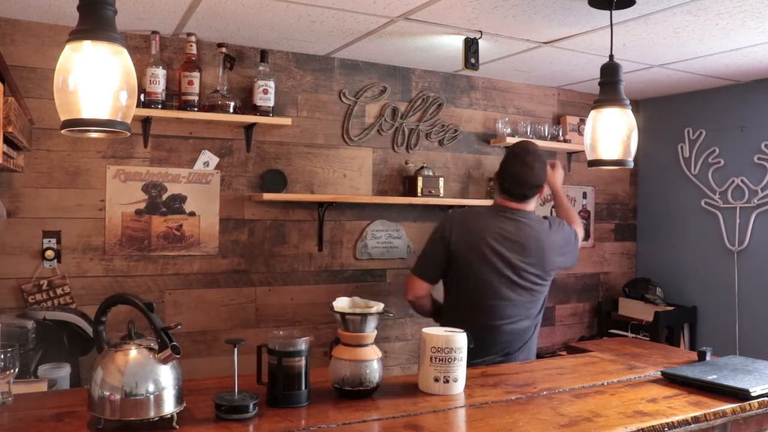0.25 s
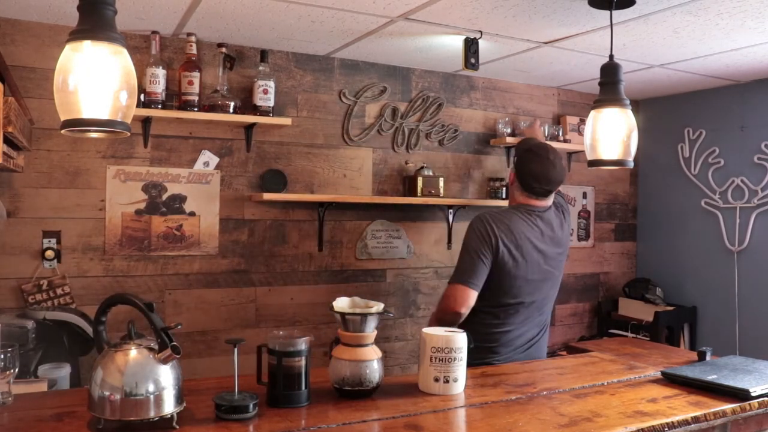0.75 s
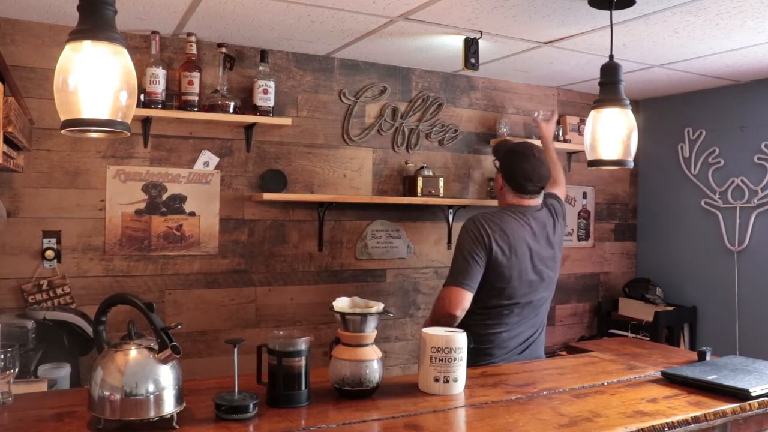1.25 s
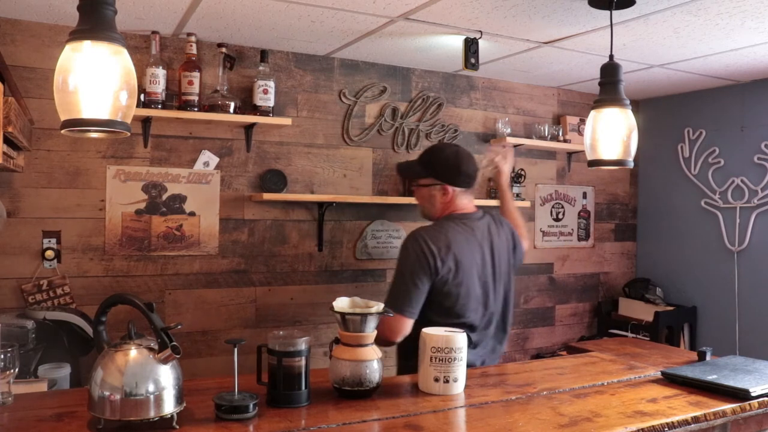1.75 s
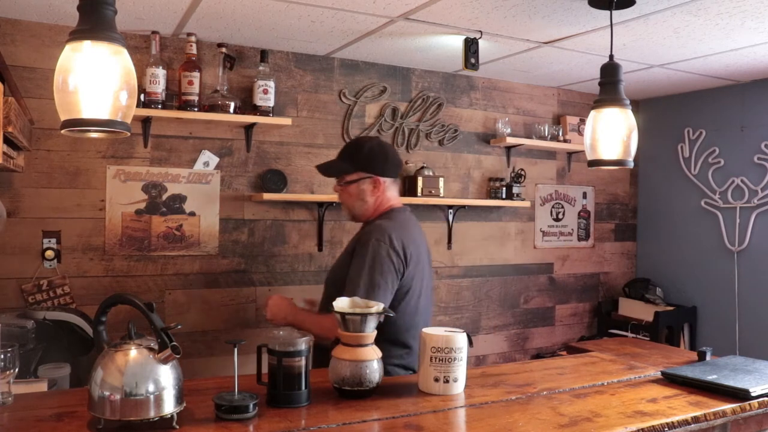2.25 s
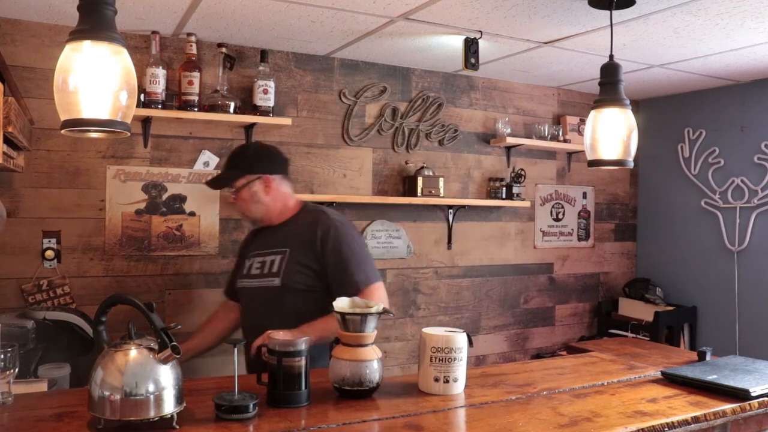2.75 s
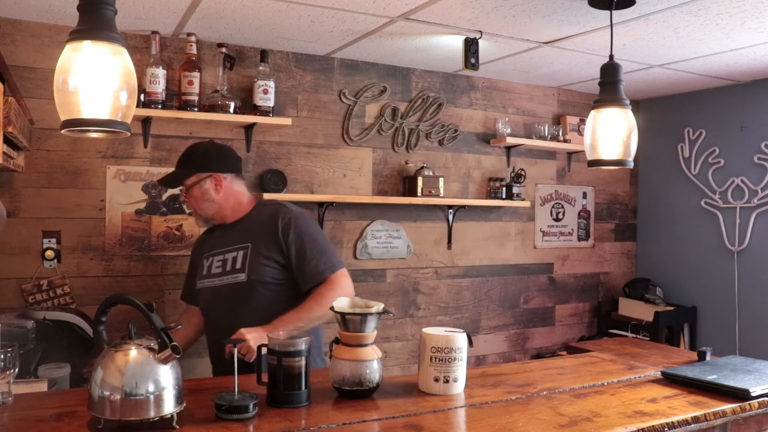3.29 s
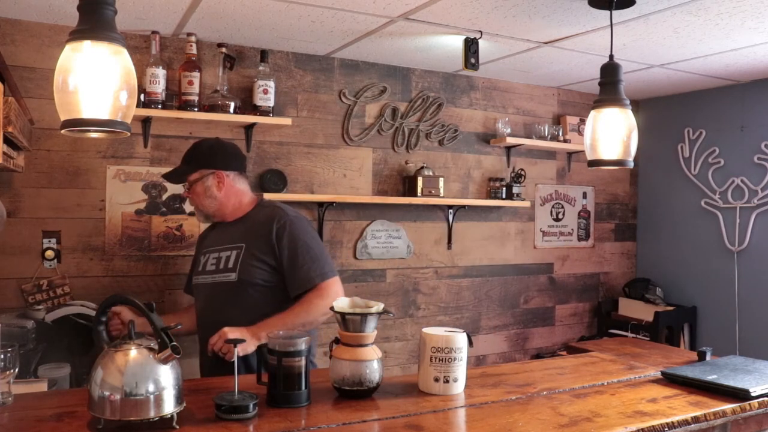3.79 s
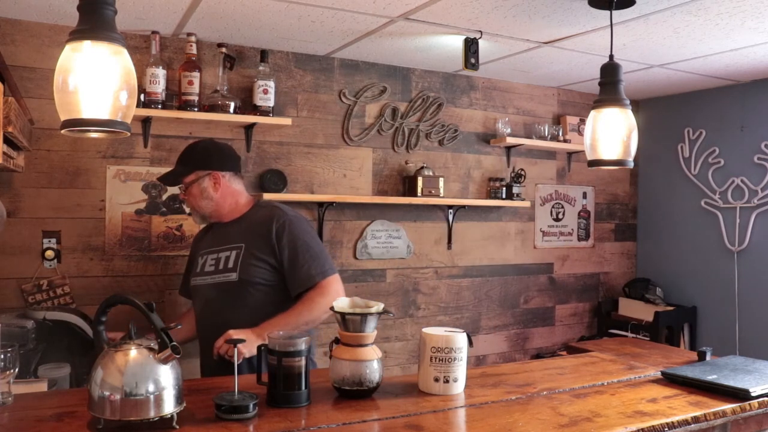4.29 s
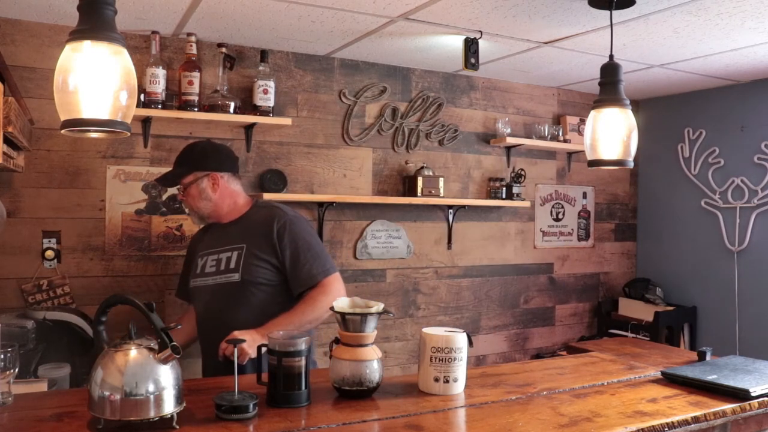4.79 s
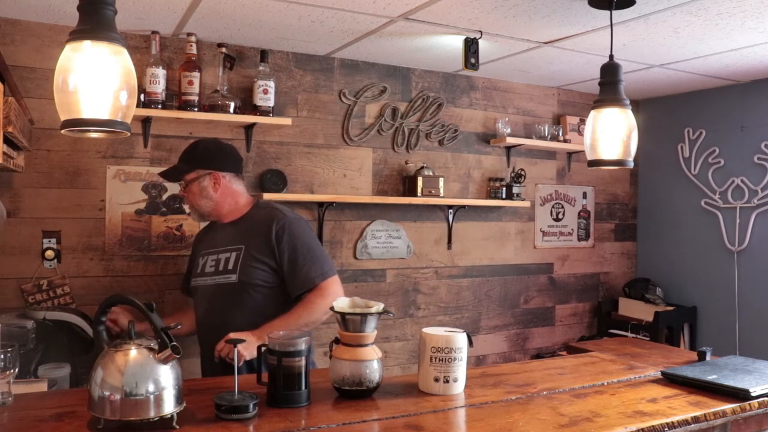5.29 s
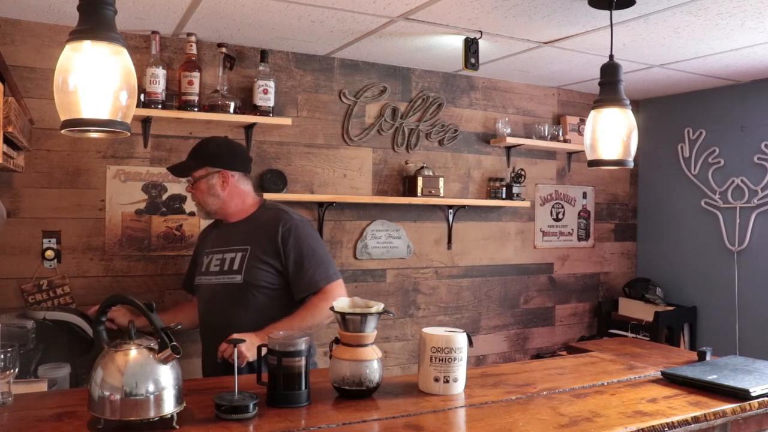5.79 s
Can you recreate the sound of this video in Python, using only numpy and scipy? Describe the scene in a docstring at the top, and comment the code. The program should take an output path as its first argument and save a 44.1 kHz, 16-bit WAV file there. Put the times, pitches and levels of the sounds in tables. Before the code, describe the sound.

A mug knocks onto a drip tray, then a pod brewer's lid snaps open and closes with a thump in a quiet room.

```python
"""A faint hiss fills a small wood-panelled room. A few metres away a man's clothes rustle by friction
as he takes a mug from a shelf with light clicks and clinks. At 3.2 s he stands it on the drip tray of
a pod coffee brewer, and the impact excites damped resonances. From 3.6 s the plastic lid rubs and
snaps open and a pod drops in. At 4.8 s he presses the lid shut with a thump; a few soft bumps and
clinks follow."""
import sys
import numpy as np
from scipy import signal
from scipy.fft import rfft, irfft
from scipy.io import wavfile
from scipy.ndimage import uniform_filter1d

SR = 44100
rng = np.random.default_rng(int(sys.argv[2]) if len(sys.argv) > 2 else 0)


def master_out(mix):
    """Clip the mix to full scale and print it as 16-bit PCM to the path in sys.argv[1]."""
    frames = np.transpose(np.atleast_2d(mix))
    ceiling = np.clip(frames, -1, 1)
    pcm = np.round(ceiling * 32767).astype(np.int16)
    wavfile.write(sys.argv[1], SR, pcm)


N = 266496
TIME = np.arange(N) / SR
AGE = TIME[:SR // 2]  # time since an impact [s]


def undb(db):
    """Decibels to amplitude ratio."""
    return 10 ** (np.asarray(db) / 20)


def along(points, hz):
    """Interpolate (frequency, value) points on a log-frequency axis."""
    f, value = np.transpose(points)
    return np.interp(np.log(hz + 1e-3), np.log(f), value)


def noise(spectrum):
    """Random-phase noise of rms 1 with the given spectral shape."""
    hz = np.fft.rfftfreq(N, 1 / SR)
    phases = np.exp(2j * np.pi * rng.random(len(hz)))
    x = irfft(undb(along(spectrum, hz)) * phases, N)
    return x / x.std()


def wander(rate):
    """Random modulation: ramps between about `rate` Gaussian values a second."""
    knots = np.linspace(0, TIME[-1], int(rate * TIME[-1]))
    return np.interp(TIME, knots, rng.standard_normal(len(knots)))


def band(x, hz, kind):
    """Butterworth filter."""
    return signal.sosfilt(signal.butter(3, hz, kind, fs=SR, output="sos"), x)


def unit(x):
    """Normalise to energy 1."""
    return x / np.sqrt(np.sum(x ** 2) + 1e-18)


def burst(x, db):
    """Give a transient the energy of 10 ms at this level."""
    return unit(x) * undb(db) * np.sqrt(SR / 100)


def add(out, start, x):
    """Superpose x on out from `start` seconds on."""
    i = max(int(start * SR), 0)
    out[i:i + len(x)] += x[:max(N - i, 0)]


def fade(t60):
    """Exponential decay by 60 dB in t60 seconds."""
    return np.exp(-np.log(1000) * AGE / max(t60, 1e-4))


def whiten(x):
    """Spectral whitening: level a random response so that it adds no note of its own."""
    spectrum = rfft(x, 2 * len(x))
    power = uniform_filter1d(uniform_filter1d(np.abs(spectrum) ** 2, size=45), size=45)
    flat = spectrum / np.sqrt(power + .1 * power.mean())
    return unit(irfft(flat)[:len(x)])


# noise floor spectrum (frequency [Hz], relative level [dB])
HISS_SPECTRUM = [(12, -28), (20, -4), (68, -1), (298, -8), (333, -10), (452, -10.5), (631, -11),
                 (1200, -14), (1300, -15.5), (1500, -15.5), (1980, -17.5), (2270, -17), (3540, -19.5),
                 (15500, -23)]
# spectral weighting of the left-right difference (frequency [Hz], gain [dB])
SIDE_WEIGHTING = [(60, -13.5), (110, -14), (200, -17), (380, -15), (700, -16.5), (1290, -19.5), (2380, -18),
                  (4400, -13), (8120, -10), (15000, -8)]
def hiss(level_db=-64, waver_db=0.57, side_db=-1.5):
    """Partial coherence: room air and microphone noise are nearly alike left and right."""
    mid = noise(HISS_SPECTRUM)
    weighting = undb(side_db + along(SIDE_WEIGHTING, np.fft.rfftfreq(N, 1 / SR)))
    side = irfft(rfft(noise(HISS_SPECTRUM)) * weighting, N)
    mid *= undb(waver_db * wander(6))
    return undb(level_db) * np.array([mid + side, mid - side])


def friction(strokes, spectrum, attack_s, release_s, grain_db):
    """Stick-slip friction: hundreds of uneven slips a second modulate the noise of each stroke."""
    envelope = np.zeros(N)
    for start, length, db in strokes:
        swell = np.clip((TIME - start) / attack_s, 0, 1)
        release = np.exp(-np.maximum(TIME - start - length, 0) / release_s)
        envelope += undb(db) * swell * release
    slips = undb(grain_db * wander(400))
    sliding = noise(spectrum) * slips
    return sliding / sliding.std() * envelope


# he steps up, stretches and turns (time [s], duration [s], level [dB])
BODY_MOVES = [(0, 0.062, -65), (.48, 1.71, -71.5), (2.52, 0.81, -72.5)]
# spectrum of his clothes (frequency [Hz], relative level [dB])
CLOTHES_SPECTRUM = [(60, -25), (250, 3.5), (800, 1.5), (1300, -2.5), (2200, -12), (8000, -31)]
def clothes_rustle():
    """Friction of cloth in slips of nearly equal size gives a smooth, dull rustle."""
    return friction(BODY_MOVES, CLOTHES_SPECTRUM, attack_s=0.013, release_s=0.063, grain_db=1)


# moves of the arm (time [s], duration [s], level [dB])
ARM_MOVES = [(0.02, 0.055, -62.5), (.24, 0.036, -67.5), (1.49, 0.043, -65.5), (1.82, 0.16, -66.5),
             (2.56, 0.044, -60), (2.79, 0.12, -66)]
# spectrum of the sleeve (frequency [Hz], relative level [dB])
SLEEVE_SPECTRUM = [(100, 3), (600, 2), (2800, 0), (6000, -8), (9000, -11.5), (16000, -41)]
def sleeve_rustle():
    """Friction of cloth in short, uneven strokes gives a brighter, grainy rustle."""
    return friction(ARM_MOVES, SLEEVE_SPECTRUM, attack_s=0.011, release_s=0.063, grain_db=5)


LOWEST_HZ = 131  # a small body radiates little below this
BASS_HZ, TREBLE_HZ = 400, 3500
def impacts(blows, modes, shell, shell_db, bass_gain_db, gain_db):
    """Modal superposition: each blow rings damped modes and a dense, brief rattle of the shell."""
    out = np.zeros(N)
    ringing = np.zeros(len(AGE))
    for hz, bandwidth, db in modes:
        decay = np.exp(-np.pi * bandwidth * AGE)
        ringing += undb(db) * 2 * np.pi * bandwidth / SR * decay * np.sin(2 * np.pi * hz * AGE)
    size = 2 * len(AGE)
    colour = undb(shell_db + along(shell, np.fft.rfftfreq(size, 1 / SR)))
    for start, db, bass_db, treble_db, rattle_t60 in blows:
        rattle = whiten(rng.standard_normal(len(AGE)) * fade(rattle_t60))
        vibration = ringing + irfft(rfft(rattle, size) * colour)[:len(AGE)]
        # the blow's weight sets the bass, its hardness the treble
        bass = burst(band(vibration, [LOWEST_HZ, BASS_HZ], "band"), db + bass_db + bass_gain_db)
        middle = burst(band(vibration, [BASS_HZ, TREBLE_HZ], "band"), db)
        treble = burst(band(vibration, TREBLE_HZ, "high"), db + treble_db)
        add(out, start, bass + middle + treble)
    return out * undb(gain_db)


# things handled at the shelf (time [s], relative level [dB], treble offset [dB])
SHELF_CONTACTS = [(0.025, -50.5, -7), (1.681, -42.5, -10), (1.757, -40.5, -8.5), (1.874, -52, -4),
                  (1.925, -53, -4), (1.987, -51, 3.5), (2.037, -45.5, -4.5)]
# their modes (frequency [Hz], bandwidth [Hz], gain [dB])
SHELF_RESONANCES = [(2740, 350, 1), (3220, 820, -13), (5170, 390, -30)]
# their rattle spectrum (frequency [Hz], gain [dB])
SHELF_RATTLE = [(120, -35), (300, -21), (700, -1), (1700, -4), (2700, -3), (5000, 5.5), (8700, 7),
                (11000, 0), (16000, -26)]
def shelf_clicks(bass_db=-14, rattle_t60=0.057):
    """Light, hard impacts excite heavily damped high modes, heard as clicks."""
    blows = [(start, db, bass_db, treble_db, rattle_t60) for start, db, treble_db in SHELF_CONTACTS]
    return impacts(blows, SHELF_RESONANCES, SHELF_RATTLE, shell_db=2, bass_gain_db=-2, gain_db=-9)


# small taps that ring with one note (time [s], level [dB], frequency [Hz])
RINGING_TAPS = [(0.448, -66, 4270), (0.582, -65, 7070), (0.684, -54, 2280), (0.715, -65, 2310),
                (1.243, -65, 2370), (1.45, -66.5, 2310), (1.522, -62, 1276), (1.562, -64.5, 1320),
                (1.664, -64, 2170), (2.299, -66, 2450), (2.433, -53, 770), (3.121, -62, 2260),
                (3.742, -51, 8000), (3.778, -41, 1580), (3.865, -57, 4170), (4.298, -39.5, 1620),
                (4.701, -51.5, 1710), (5.696, -52.5, 746), (5.822, -62.5, 1580), (6.027, -58.5, 866)]
def clinks(tick_db=-6, tick_t60=0.031, note_db=-1, t60_cycles=51):
    """Constant-Q decay: after a tick each note rings a set number of cycles, so high ones die sooner."""
    out = np.zeros(N)
    for start, db, hz in RINGING_TAPS:
        note = unit(np.sin(2 * np.pi * hz * AGE) * fade(t60_cycles / hz))
        contact = whiten(rng.standard_normal(len(AGE)) * fade(tick_t60))
        tick = unit(signal.lfilter(*signal.iirpeak(hz, Q=3.5, fs=SR), contact))
        add(out, start, burst(undb(note_db) * note + undb(tick_db) * tick, db))
    return out


# the mug lands (time [s], relative level [dB], bass offset [dB], treble offset [dB], rattle T60 [s])
MUG_CONTACTS = [(3.1545, -25.5, -21.5, -16.5, 0.026), (3.157, -15.5, -22.5, -23.5, 0.017),
                (3.1665, -32.5, -3, -30, 0.22)]
# modes of mug and tray (frequency [Hz], bandwidth [Hz], gain [dB])
MUG_RESONANCES = [(172, 46, -13), (420, 91, -17), (780, 37, -17), (906, 31, 3), (948, 61, 2.5),
                  (1194, 43, -2.5), (1640, 143, 1.5), (1730, 36, -17), (1900, 50, -28)]
# their rattle spectrum (frequency [Hz], gain [dB])
MUG_RATTLE = [(40, -37), (130, -10.5), (400, -18), (900, -13), (1800, -10.5), (2300, -25), (3600, -17.5),
              (4400, -24.5), (5600, -16), (7500, -21), (10000, -31.5), (16000, -54.5)]
def mug_on_tray():
    """Impulse excitation: the mug meets the drip tray edge first, in three quick contacts."""
    return impacts(MUG_CONTACTS, MUG_RESONANCES, MUG_RATTLE, shell_db=1.5, bass_gain_db=4.5, gain_db=-8)


# the lid unlatches, grinds up and snaps open; the pod drops in
# (time [s], relative level [dB], treble offset [dB], rattle T60 [s], rebound offset [dB])
SNAPS = [(3.645, -39.5, -4, 0.044, -10), (3.743, -33.5, 4, 0.052, -2), (3.776, -29, -5, 0.032, -0.5),
         (3.816, -29.5, -9.5, 0.032, -7), (4.073, -39, -11, .035, -6), (4.111, -19, -5.5, 0.032, 0.5),
         (4.227, -38.5, -1, .05, -14), (4.254, -42, 6.5, .055, -11), (4.297, -37.5, 2.5, 0.02, -13)]
# loose parts knock back, each time weaker and heavier (delay [s], level offset [dB], bass offset [dB])
SNAP_REBOUNDS = [(0.01, -0.5, -21), (0.029, -12.5, 0), (0.052, -19.5, 5.5)]
# hand and lid bump the brewer's body (time [s], relative level [dB])
SOFT_BUMPS = [(3.686, -40.5), (3.751, -35), (4.302, -43), (4.44, -56), (4.47, -56.5), (5.696, -47),
              (5.764, -54.5), (5.879, -49), (5.992, -52)]
# modes of the lid (frequency [Hz], bandwidth [Hz], gain [dB])
LID_RESONANCES = [(202, 90, -1.5), (350, 60, 0), (610.4, 14, 4), (870, 55, -3), (882, 145, -4),
                  (1460, 30, 6), (1620, 42, 1.5), (1720, 30, -22), (1980, 13, 1), (3130, 56, -6)]
# its rattle spectrum (frequency [Hz], gain [dB])
LID_RATTLE = [(40, -26), (90, -18), (200, -8), (700, -4), (1150, -7), (1700, -5), (2500, -10.5),
              (3800, -16.5), (5300, -12.5), (7000, -22.5), (8600, -19), (11000, -30), (16000, -40)]
def lid_knocks():
    """Contact hardness sets timbre: thin snaps, dull rebounds and soft bumps ring the same modes."""
    snap_bass_db = -20
    rebound_treble_db, rebound_t60 = -25, 0.05
    bump_bass_db, bump_treble_db, bump_t60 = 4, -8.5, 0.11
    snaps = [(start, db, snap_bass_db, treble_db, t60) for start, db, treble_db, t60, _ in SNAPS]
    rebounds = [(start + delay, db + rebound_db + drop_db, bass_db, rebound_treble_db, rebound_t60)
                for start, db, _, _, rebound_db in SNAPS
                for delay, drop_db, bass_db in SNAP_REBOUNDS]
    bumps = [(start, db, bump_bass_db, bump_treble_db, bump_t60) for start, db in SOFT_BUMPS]
    blows = snaps + rebounds + bumps
    return impacts(blows, LID_RESONANCES, LID_RATTLE, shell_db=-0.5, bass_gain_db=2, gain_db=-11.5)


# sliding at the hinge and pod holder (time [s], duration [s], level [dB])
PLASTIC_SLIDES = [(3.648, 0.068, -53), (3.733, 0.086, -46.5), (3.93, 0.18, -61.5), (4.098, 0.012, -41.5),
                  (4.235, .04, -53.5), (4.3, 0.15, -69.5)]
# spectrum of the rubbed plastic (frequency [Hz], relative level [dB])
PLASTIC_SPECTRUM = [(30, 0), (100, -5), (190, 8), (430, -4.5), (600, 7.5), (730, -0.5), (900, -5),
                    (1200, -9), (1600, -0.5), (2400, -7.5), (6000, -15.5), (9000, -20), (11000, -46),
                    (16000, -36)]
def plastic_rub():
    """Stick-slip friction of plastic on plastic gives short, grainy scrapes."""
    return friction(PLASTIC_SLIDES, PLASTIC_SPECTRUM, attack_s=0.013, release_s=0.025, grain_db=4.5)


# the lid shuts and its latch catches
# (time [s], relative level [dB], bass offset [dB], treble offset [dB], rattle T60 [s])
LATCH_CONTACTS = [(4.81, -21.5, 3, -13, 0.031), (4.821, -23, 0, -27, 0.12)]
# modes of the brewer's case (frequency [Hz], bandwidth [Hz], gain [dB])
CASE_RESONANCES = [(175, 21, 4), (226, 23, 3.5), (325, 6.4, 5.5), (434, 16, -1.5), (505, 12.5, 1.5),
                   (582, 21, -28), (760, 39, -6), (923, 35, -9.5), (1560, 120, -20.5), (1710, 110, -30),
                   (3525, 6.5, -20)]
# its rattle spectrum (frequency [Hz], gain [dB])
CASE_RATTLE = [(40, -48), (95, -27), (170, -16), (500, -3.5), (640, -20.5), (900, -30), (1250, -33.5),
               (1800, -26.5), (3400, -30.5), (8500, -35.5), (11000, -50), (16000, -60)]
def lid_thump():
    """Free vibration: struck by the closing lid, the case rings mainly in its low modes."""
    return impacts(LATCH_CONTACTS, CASE_RESONANCES, CASE_RATTLE,
                   shell_db=0.5, bass_gain_db=1.5, gain_db=-7)


# reverberation time of the room (frequency [Hz], T60 [s])
REVERB_TIMES = [(100, 0.39), (400, 0.25), (1500, 0.18), (5000, 0.22), (12000, 0.16)]
def room(x, early_db, early_t60, tail_db, scatter_hz=265):
    """Reverberation: early reflections off counter and wall, then a tail that is longest in the bass."""
    edges = np.geomspace(50, 16000, 9)
    white = rng.standard_normal(len(AGE))
    tail = sum(band(white, [lo, hi], "band") * fade(along(REVERB_TIMES, np.sqrt(lo * hi)))
               for lo, hi in zip(edges, edges[1:]))
    tail = unit(tail * np.clip(AGE / 0.0036, 0, 1))
    early = unit(rng.standard_normal(len(AGE)) * fade(early_t60) * (AGE > .0015))
    # longer waves pass by loose parts and furniture
    echoes = band(undb(early_db) * early + undb(tail_db) * tail, scatter_hz, "high")
    direct = AGE == 0
    return signal.fftconvolve(x, whiten(direct + echoes))[:N]


def scene():
    """Superposition: all the handling comes from straight ahead, over the stereo hiss."""
    knocks = mug_on_tray() + lid_knocks() + lid_thump() + shelf_clicks()
    rubbing = plastic_rub() + sleeve_rustle() + clothes_rustle()
    taps = room(clinks(), early_db=-6, early_t60=0.035, tail_db=-14)
    handling = room(knocks + rubbing, early_db=-3, early_t60=0.031, tail_db=-6.5)
    return handling + taps + hiss()


def record(dry):
    """Band limiting: a steep low-pass cuts the treble above 15.9 kHz."""
    return signal.sosfilt(signal.ellip(10, .1, 70, 15900, fs=SR, output="sos"), dry)


dry = scene()
out = record(dry)
master_out(out)
```